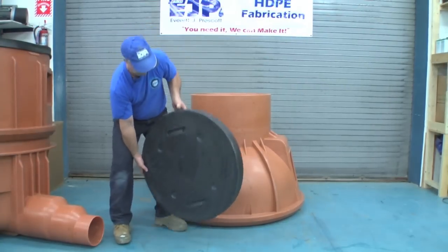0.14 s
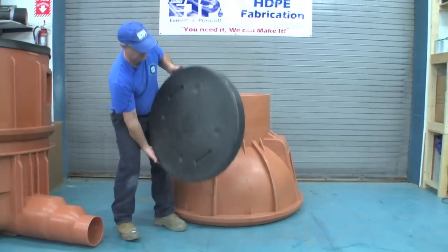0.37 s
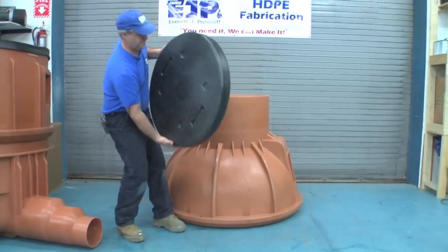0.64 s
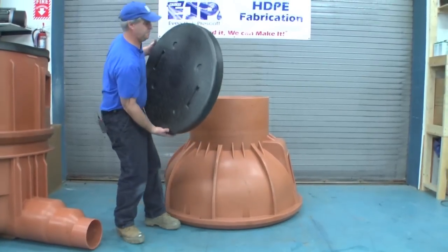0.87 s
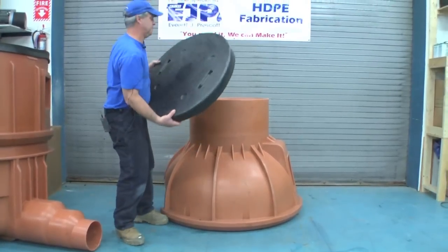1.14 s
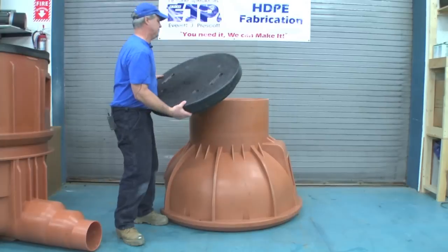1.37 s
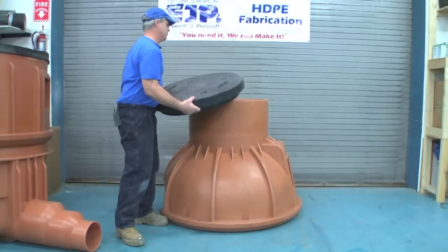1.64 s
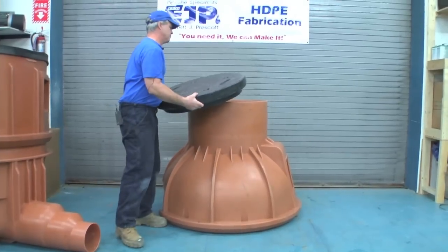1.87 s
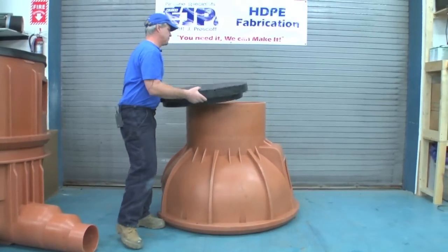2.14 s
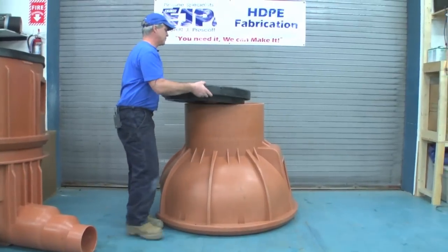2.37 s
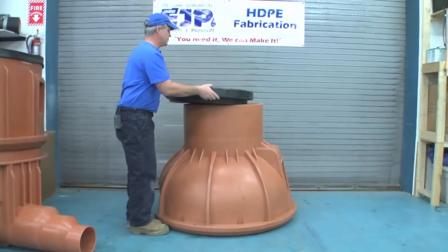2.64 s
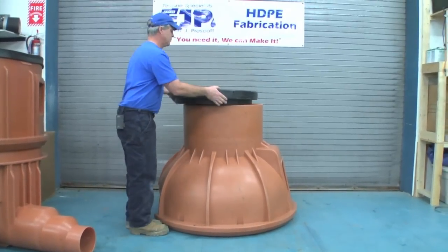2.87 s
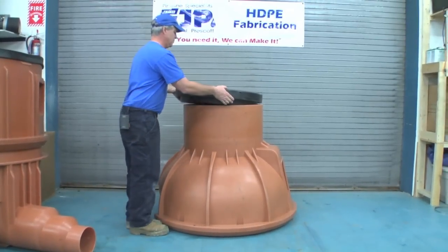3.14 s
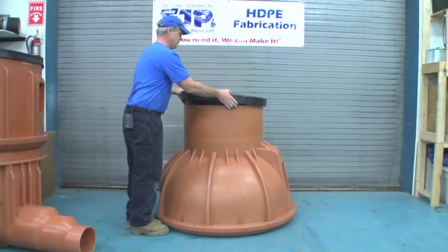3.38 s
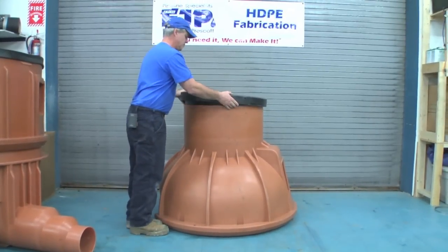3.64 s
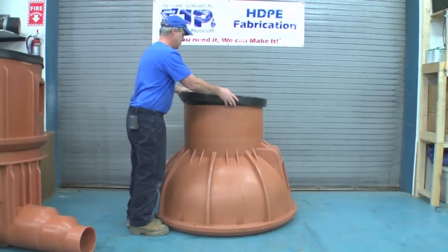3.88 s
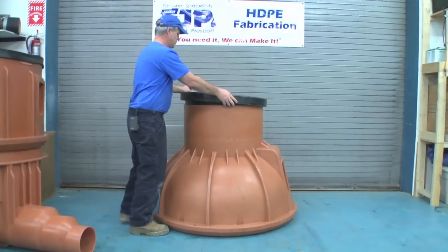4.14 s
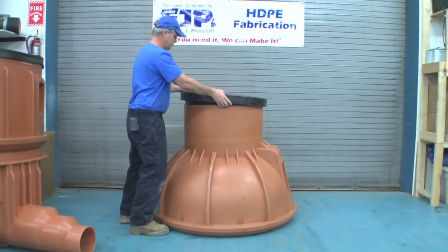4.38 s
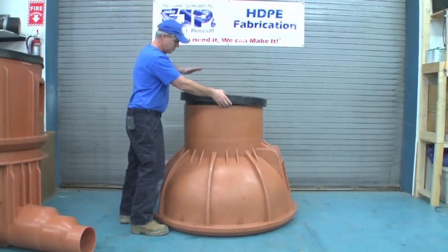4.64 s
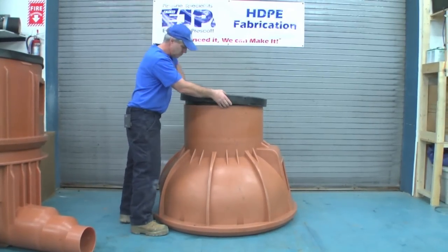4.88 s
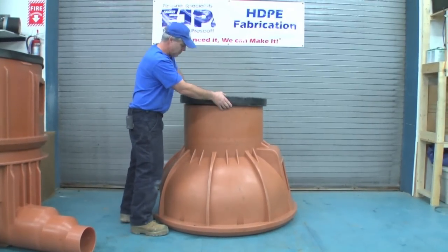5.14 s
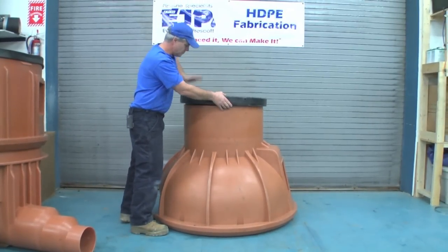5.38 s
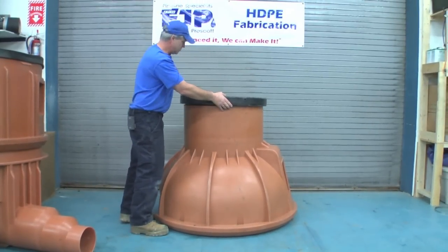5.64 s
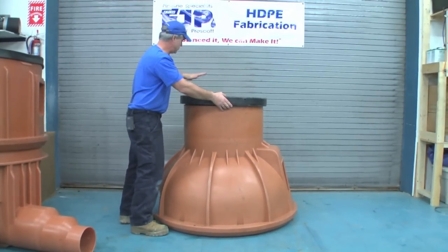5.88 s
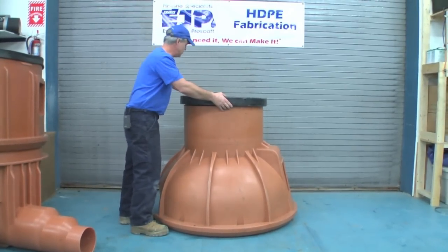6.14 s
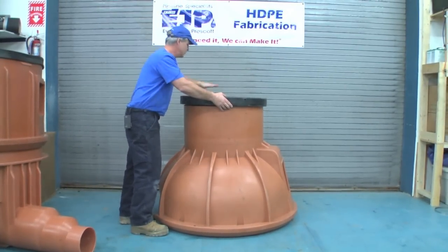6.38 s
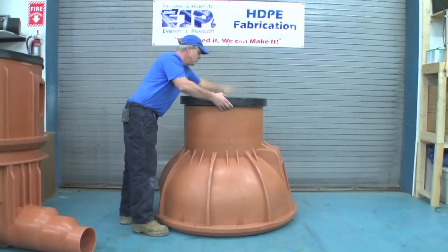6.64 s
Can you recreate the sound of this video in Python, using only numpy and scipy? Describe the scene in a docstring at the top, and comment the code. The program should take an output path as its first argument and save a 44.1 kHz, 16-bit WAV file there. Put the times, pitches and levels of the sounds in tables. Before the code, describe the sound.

Quiet room tone first, with faint scuffing and dull clicks of a plastic rim. Then heavy hollow knocks with a little crackle, a few muffled bumps, and a quick clatter as the cover drops into place on the plastic cone. Hands slide briefly over it. Four strong, evenly spaced palm slaps end the scene, bright at the strike and boomy beneath, heard by a single microphone in a reverberant workshop.

```python
"""Plastic cover on a hollow cone

One microphone in a hard-walled workshop hears a heavy plastic cover lifted onto a hollow plastic cone.
Rim knocks and a few soft thuds, then open palms slapping it home: noise bursts plus decaying cone modes.
Hands slide and the cover scuffs (stuttering noise in three bands); grip and rim tick (damped sines and
scratch); treble crackles go with some heavy knocks. Mains hum and air noise fill the room."""
import sys
import numpy as np
from scipy import signal
from scipy.fft import rfft, irfft
from scipy.io import wavfile
from scipy.ndimage import map_coordinates

SR = 44100
rng = np.random.default_rng(int(sys.argv[2]) if len(sys.argv) > 2 else 0)


def level_to_linear(level):
    """Convert decibel levels to linear amplitude factors, elementwise."""
    exponent = np.asarray(level, float) / 20
    return 10 ** exponent


def materialize(psi):
    """Save the field psi as 16-bit PCM at rate SR to the path in sys.argv[1].

    A 1-D psi becomes a single channel; in a 2-D psi each row is a channel.
    """
    bounded = np.clip(np.atleast_2d(psi).T, -1, 1)
    quanta = np.round(bounded * 32767).astype(np.int16)
    wavfile.write(sys.argv[1], SR, quanta)


N = 298116


def unit(x):
    """Scale to rms 1."""
    return x / np.sqrt(np.mean(x ** 2) + 1e-20)


def along(points, hz):
    """(Hz, value) points read on a log axis."""
    f, v = np.transpose(sorted(points))
    return np.interp(np.log(hz + 1), np.log(f + 1), v)


def noise(size, gain):
    """White noise of rms 1 shaped by a gain over frequency."""
    hz = np.fft.rfftfreq(size, 1 / SR)
    return irfft(rfft(rng.standard_normal(size)) * gain(hz), size)


def wobble(rate):
    """A smooth random curve, rate knots a second."""
    knots = rng.standard_normal(int(N * rate / SR) + 4)
    return map_coordinates(knots, [np.arange(N) * rate / SR])


def add(track, s, sound):
    """Mix a sound in from time s."""
    part = track[round(s * SR):][:len(sound)]
    part += sound[:len(part)]


def held(start, length, attack, during_db, release_db_per_s):
    """Gain of one contact: it takes hold, drifts by during_db while it lasts, then dies away."""
    t = np.arange(N) / SR - start
    drift_db = during_db * np.clip(t / length, 0, 1) - release_db_per_s * np.clip(t - length, 0, None)
    return np.clip(t / attack, 0, 1) * level_to_linear(drift_db)


def background():
    """Air noise that drifts a little, and slightly unsteady mains hum."""
    # colour of the air noise: (frequency [Hz], relative density [dB per Hz])
    air_colour = [(12, -38), (20, -4), (63, -10), (243, -14), (264, -26), (295, -9.5), (380, -20),
                  (476, -17), (563, -19.5), (1310, -23.5), (2050, -27.5), (15000, -37), (16300, -41.5)]
    # hum partials: (frequency [Hz], level relative to one another [dB])
    hum_partials = [(59.2, -68), (118.4, -71), (242.2, -78.5), (301.5, -84)]
    air_db, hum_raise_db = -60.5, 6.5
    t = np.arange(N) / SR
    air_level = level_to_linear(air_db + 0.21 * wobble(0.83))
    air = air_level * unit(noise(N, lambda f: level_to_linear(along(air_colour, f))))
    hum = np.zeros(N)
    for hz, db in hum_partials:
        level = level_to_linear(db + hum_raise_db + 0.87 * wobble(10.0))
        hum += level * np.sin(2 * np.pi * hz * t + 1.2 * wobble(26))
    return air + hum


def in_shop(x, sent, gap):
    """The direct sound, one wall and a fresh echo tail whose every frequency dies at its own speed."""
    # main decay of the workshop: (frequency [Hz], t60 [s])
    shop_t60 = [(60, 0.23), (250, 0.46), (700, 0.51), (2000, 0.57), (3000, 0.59), (5000, 0.51),
                (9000, 0.31), (14000, 0.33)]
    # colour of the echo: (frequency [Hz], relative level [dB])
    echo_colour = [(60, -20), (400, -7.5), (2000, -10.5), (8000, -13.5), (14000, -11.5)]
    # the nearest wall: (delay [s], level [dB])
    wall_s, wall_db = (.0215, -16.5)
    hz, t, z = signal.stft(rng.standard_normal(SR * 4 // 5), SR, nperseg=512)
    fall_db = -60 * t / along(shop_t60, hz)[:, None]
    fade = level_to_linear(fall_db) + level_to_linear(-17.5 + fall_db * 0.56)  # far corners hold a weaker, slower decay
    fade *= level_to_linear(along(echo_colour, hz))[:, None] / np.linalg.norm(fade, axis=1, keepdims=True)
    tail = signal.istft(z * fade, SR, nperseg=512)[1] / 16
    # the echo gathers after a short gap
    tail = tail * np.clip(np.arange(len(tail)) / SR / gap - .5, 0, 1)
    out = signal.fftconvolve(sent, tail)
    add(out, 0, x)
    add(out, wall_s, level_to_linear(wall_db) * x)
    return out


def ticks():
    """Grip and rim tick and creak: short damped clicks, part pitch and part scratch around that pitch."""
    # (time [s], level before the decay [dB], pitch [Hz], t60 [s], scratch share [rms over pitch amplitude])
    tick_rows = [(.055, -51, 650, 0.021, 0.7), (0.067, -46, 360, 0.045, .1), (.145, -54, 1025, 0.022, .5),
                 (.9956, -55, 5270, 0.015, .5), (1.181, -51.5, 2510, .012, 2.9),
                 (1.256, -50.5, 3620, .015, 0.5), (1.327, -51, 1850, 0.049, 0.54),
                 (1.394, -32, 440, 0.015, 0.5), (1.395, -57, 1970, 0.02, 1.9),
                 (1.445, -29.5, 444, 0.014, 0.59), (1.447, -48, 2074, 0.033, 0.58),
                 (1.538, -29.5, 488, 0.015, 0.19), (1.573, -42.5, 610, 0.091, 0.29),
                 (2.212, -41, 1270, 0.09, 0.051)]
    out, t = np.zeros(N), np.arange(SR // 10) / SR
    for s, db, hz, t60, rough in tick_rows:
        scratch = unit(noise(len(t), lambda f: 1 / (1 + (np.log(f / hz + 1e-9) / 0.32) ** 4)))
        click = np.sin(2 * np.pi * hz * t) + rough * scratch
        decay = level_to_linear(db - 60 * t / max(t60, .004))
        onset = 1 - np.exp(-t * hz / 0.31)
        add(out, s, click * decay * onset)
    return in_shop(out, level_to_linear(1.5) * out, gap=.012)[:N]


def slides():
    """Skin and rim drag unevenly: three friction layers share one stutter; each contact sets the rasp pitch."""
    # hands grip suddenly and ease off:
    # (start [s], length [s], rasp level before the stutter [dB], rasp pitch [Hz], hiss over rasp [dB])
    strokes = [(3.231, 0.047, -54, 3470, -6.5), (3.33, 0.18, -63.5, 4380, 2.5),
               (3.486, 0.19, -56.5, 5200, -2.5), (3.73, 0.13, -57, 4100, -2),
               (3.878, 0.21, -60.5, 3300, -2.5), (4.106, 0.16, -58.5, 2780, -6),
               (4.557, 0.045, -67.5, 5460, 2), (4.609, .05, -60.5, 2340, -4),
               (4.658, 0.052, -61, 3240, -16), (4.738, 0.056, -57, 2880, -16.5),
               (4.812, .11, -54, 2790, -9.5), (4.929, 0.041, -57, 2800, -11.5)]
    # the cover scuffs as it is carried and shifted; levels are those reached at the end, before the stutter:
    # (start [s], length [s], rumble level [dB], rasp over rumble [dB], hiss over rumble [dB])
    scuffs = [(0.244, 0.39, -60.5, -3.5, -7), (1.072, 0.14, -62.5, -20, -11),
              (1.478, 0.38, -60.5, -2.5, -23), (6.474, 0.26, -63.5, -6.5, -15.5)]
    # growth of a scuff from start to end: rumble, rasp, hiss [dB]
    scuff_growth = [0.5, 7.5, 8]
    # colours of rumble and of hiss: (frequency [Hz], relative level [dB])
    slide_bands = [
        [(200, -18.5), (400, 1.5), (650, 1.5), (900, -0.5), (1600, -4.5), (2500, -27.5)],
        [(3500, -35), (5000, 5.5), (7000, 2.5), (9000, -2), (13000, -8), (16000, -15.5)],
    ]
    grip_s, ease_db_per_s, let_go_db_per_s = 0.017, 21, 150.5
    stroke_rumble_db = -7.5  # over rasp
    scuff_hz, scuff_start_s, scuff_stop_db_per_s = 2400, 0.032, 300

    gains = np.zeros((3, N))  # rumble, rasp, hiss
    for s, length, db, _, hiss_db in strokes:
        touch = held(s, length, grip_s, -ease_db_per_s * length, let_go_db_per_s)
        gains += level_to_linear(db + np.array([[stroke_rumble_db], [0], [hiss_db]])) * touch
    for s, length, db, rasp_db, hiss_db in scuffs:
        grows_db = np.array(scuff_growth)[:, None]
        touch = held(s, length, scuff_start_s, grows_db, scuff_stop_db_per_s)
        gains += level_to_linear(db - grows_db + np.array([[0], [rasp_db], [hiss_db]])) * touch
    stutter_db = .9 * wobble(40) + 0.57 * wobble(480)

    layers = []
    for band in slide_bands:
        closed = [(20, -120), *band, (22000, -120)]
        layers.append(noise(N, lambda f: level_to_linear(along(closed, f))))
    # the rasp is a noise hump that jumps to a new pitch as each contact starts
    hz, t, z = signal.stft(rng.standard_normal(N), SR, nperseg=512)
    pitches = [(r[0], r[3]) for r in strokes] + [(r[0], scuff_hz) for r in scuffs]
    starts, pitch = np.transpose(sorted(pitches))
    centre = pitch[np.clip(np.searchsorted(starts, t) - 1, 0, None)]
    hump = 1 / (1 + (np.log((hz[:, None] + 1) / centre) / 0.44) ** 4)
    rasp = signal.istft(z * hump / np.sqrt(centre), SR, nperseg=512)[1][:N]
    layers.insert(1, rasp)
    return level_to_linear(stutter_db) * sum(g * unit(x) for g, x in zip(gains, layers))


def crackles():
    """Each run is a string of sub-millisecond treble clicks, unevenly spaced and fading, with no echo."""
    # runs of clicks around heavy knocks: (start [s], length [s], level before filter and fade [dB])
    runs = [(1.694, .002, -55.5), (1.993, .006, -39.5), (2.3176, .036, -33.5)]
    gap_s, fade_db_per_s, spread_db = 0.0043, 204, 3.5
    out, t = np.zeros(N), np.arange(SR // 100) / SR
    for start, length, db in runs:
        luck = rng.standard_normal((10, 2))
        for k, (shift, size) in enumerate(luck):
            late = gap_s * (k + .15 * shift * (k > 0))
            fizz = noise(len(t), lambda f: 1 / (1 + (2500 / (f + 1)) ** 4) / (1 + f / 9000))
            level = level_to_linear(db - fade_db_per_s * late + spread_db * size) * (late < length)
            pulse = np.exp(-((t - .003) / .0005) ** 2)  # peaks 3 ms in, so it is placed 3 ms early
            add(out, start + late - .003, level * fizz * pulse)
    return out


def blows(rows, colour_hz, contact, boom_db, ring_db, echo_db, ms, edge):
    """Each contact chatters for a few ms and rings the cone's modes, coloured by where and how it lands."""
    # cover and cone ringing together: (nominal frequency [Hz], relative level [dB], t60 [s])
    cone_modes = [(46.24, -7.5, 0.7), (54.5, 1, 0.59), (77, -11.5, 0.97), (93.8, 3.5, 0.32),
                  (115.3, -1, 0.55), (155, -6, 0.43), (171, -15, 0.87), (182.9, 3, 0.29), (208, -3, 0.24),
                  (241.3, -5.5, 0.4), (283, -3.5, 0.3), (313.5, -4.5, 0.32), (319.6, -20.5, 0.76),
                  (343.4, -1, 0.19), (411.6, -5.5, 0.18), (469, -6, 0.16), (502, -21, .8),
                  (522.1, -5.5, 0.23), (611, -3.5, 0.16), (685, -6, 0.22), (750.4, -5.5, 0.12),
                  (845, -18, 0.42), (974, -15.5, 0.13), (1090, -25, .6), (1156, -8.5, 0.06),
                  (1430, -10.5, 0.097), (1626, -16, 0.13)]
    boom_hz, boom_grows = 50, 0.63  # dB of boom for each dB of drum
    below_drum, below_drum_db = 0.58, -8  # the strike is weak at this share of the drum pitch
    # once the cover closes the cone: more boom, and a harder clack
    seated_s, seated_boom_db, clack_hz, seated_clack_db = 3.2, 4.5, 1200, 3

    out, t = np.zeros(N), np.arange(SR * 2 // 3) / SR
    f = np.fft.rfftfreq(len(t), 1 / SR)
    hz, mode_db, t60 = np.transpose(cone_modes)[:, :, None]
    bumps = np.clip(1 - np.abs(t / .03 - np.arange(24)[:, None]), 0, 1)  # joins random knots 30 ms apart
    swell = 1 - np.exp(-t * hz / 0.6)  # a mode builds up over its first cycles
    lasts = np.array([[ms], [ms * 0.5]]) / 1000  # the treble stops first as the contact spreads
    pressed = np.clip(t / 0.00045, 0, 1) / (1 + (t / lasts) ** edge)
    treble = 1 / (1 + (3000 / (f + 1)) ** 4)
    for s, *colour, drum_hz in rows:
        seated = s > seated_s
        drum_db = colour[-1]
        strike = [*zip(colour_hz + [drum_hz], colour),
                  (below_drum * drum_hz, drum_db + below_drum_db),
                  (boom_hz, boom_db + boom_grows * drum_db + seated_boom_db * seated)]
        clack_db = seated_clack_db * seated / (1 + (np.log((f + 1) / clack_hz) / 0.16) ** 2)

        luck = rng.standard_normal((2, len(hz), 1))
        # each mode wavers randomly in level and phase, so the ring sounds rough
        waver = rng.standard_normal((2, len(hz), len(bumps))) @ bumps
        size_db = mode_db + along(strike, hz) + 2.4 * luck[0] + 2.51 * waver[0] + ring_db
        size = level_to_linear(size_db - 60 * t / t60)
        turn = 2 * np.pi * hz * (1 + 0.0073 * luck[1]) * t
        turn = turn + 0.78 * (1 + hz / 400) * (waver[1] - waver[1][:, :1])
        ring = np.sum(size * swell * np.sin(turn), axis=0)

        slope = level_to_linear(along(strike, f) + along(contact, f) + clack_db)
        slope = slope * f / (f + 500) * np.sqrt(2400 / (f + 50))
        parts = slope * np.array([1 - treble, treble])
        bursts = irfft(rfft(rng.standard_normal(len(t))) * parts, len(t))
        chatter = np.sum(pressed * bursts, axis=0)
        # summed over all directions the chatter has a smooth colour
        even = irfft(slope, len(t)) * np.linalg.norm(pressed[0])
        spread = np.roll(even, round(ms * SR / 2000))  # half the contact time late
        spread[len(t) // 2:] = 0
        add(out, s, in_shop(ring + chatter, ring + level_to_linear(echo_db) * spread, gap=0.0049))
    return out


def knocks():
    """Rim knocks and a few soft thuds: short chatter drives the hollow cone."""
    # (time [s], knock [relative dB], snap [relative dB], drum [relative dB], drum pitch [Hz])
    knock_rows = [(1.13, -41.5, -98, -38, 132), (1.701, -15, -37.5, -4.5, 193),
                  (1.981, -17, -33.5, -4.5, 219), (2.311, -8.5, -34, -5.5, 250),
                  (2.324, -23, -40.5, -2, 180), (2.564, -34.5, -77, -16, 173), (2.624, -38, -80, -24, 183),
                  (2.655, -45.5, -70, -26, 191), (2.702, -34, -70, -19, 184),
                  (2.902, -27.5, -66, -17.5, 171), (2.934, -25.5, -56.5, -21.5, 187),
                  (3.269, -13, -30.5, -13.5, 172), (3.39, -17.5, -60, -17.5, 163),
                  (3.468, -14.5, -30.5, -7, 350), (3.481, -16.5, -26.5, -19, 417),
                  (3.497, -28, -34, -22, 273), (3.514, -40, -35, -21, 283), (4.198, -54, -50.5, -45, 131)]
    # where knock and snap lie: frequencies [Hz]
    knock_hz = [700, 4000]
    # colour of the chatter: (frequency [Hz], relative level [dB])
    rim = [(300, 7.5), (1200, 11.5), (2500, 10.5), (4500, 9), (6000, -3), (9000, -12.5), (16000, -20)]
    return blows(knock_rows, knock_hz, rim, boom_db=-17, ring_db=-6.0, echo_db=5.5, ms=8, edge=1.416)


def slaps():
    """Open palms land on the cover: air squeezed from under the hand bursts out and the cone booms."""
    # (time [s], knock [relative dB], snap [relative dB], drum [relative dB], drum pitch [Hz])
    slap_rows = [(4.983, -6, -13, -14, 161), (5.5145, -6, -15, -6, 344), (6.119, -5, -13, -7.5, 323),
                 (6.754, -10, -14.5, -12.5, 312)]
    # where knock and snap lie: frequencies [Hz]
    slap_hz = [1000, 5000]
    # colour of the squeezed air: (frequency [Hz], relative level [dB])
    palm = [(300, 15), (700, 10), (1600, 7.5), (2800, 12), (5000, 6.5), (9000, -0.5), (13000, -3.5),
            (16000, -16.5)]
    return blows(slap_rows, slap_hz, palm, boom_db=-19.5, ring_db=-4.5, echo_db=1.0, ms=7.9, edge=3.7)


def scene():
    """All sources at one microphone."""
    return (background() + ticks() + slides() + crackles() + knocks() + slaps())[None]


def roll_off(x):
    """The treble ends steeply here."""
    return signal.sosfilt(signal.butter(12, 16450, fs=SR, output="sos"), x)


def record(dry):
    """The input stage bends abruptly on big swings and stops at its rail."""
    knee, squeeze, rail = .55, .3, .96  # of full scale; squeeze is the share lost beyond the knee
    beyond_knee = dry - np.clip(dry, -knee, knee)
    bent = dry - squeeze * beyond_knee
    return roll_off(np.clip(bent, -rail, rail))


dry = scene()
out = record(dry)
materialize(out)
```